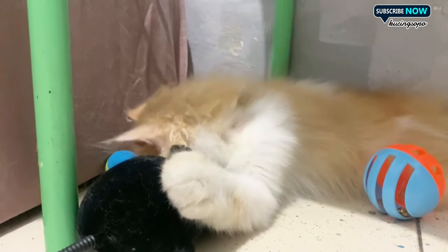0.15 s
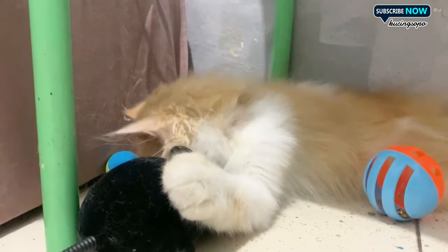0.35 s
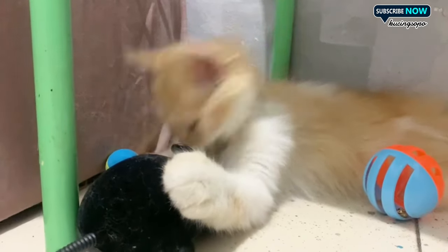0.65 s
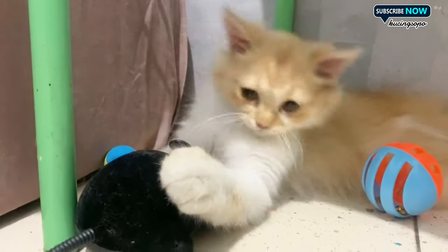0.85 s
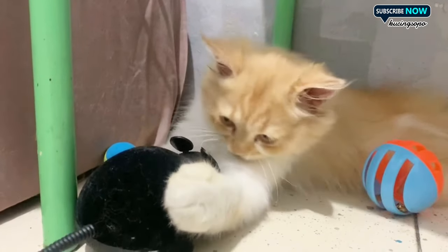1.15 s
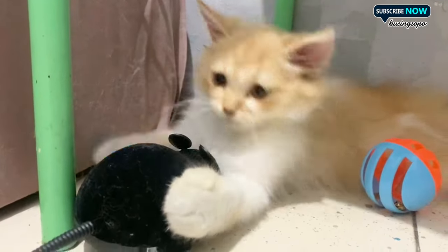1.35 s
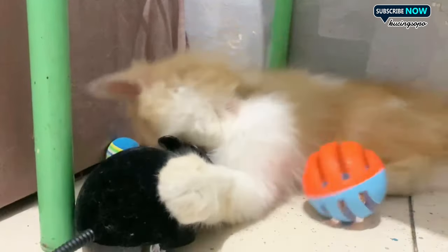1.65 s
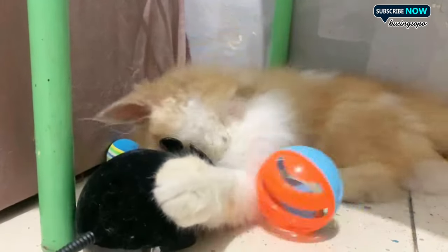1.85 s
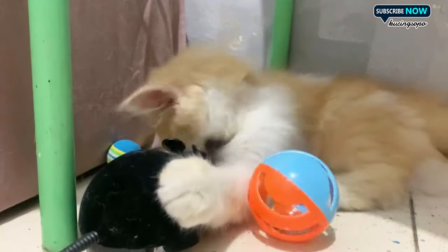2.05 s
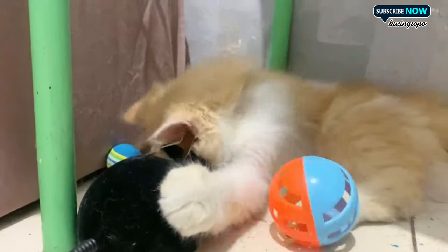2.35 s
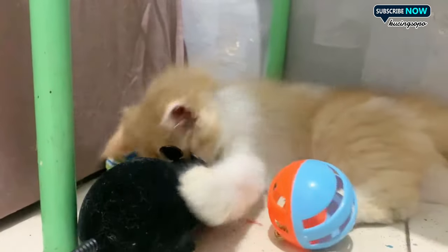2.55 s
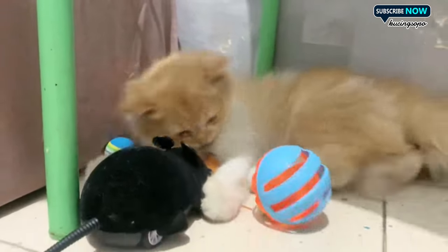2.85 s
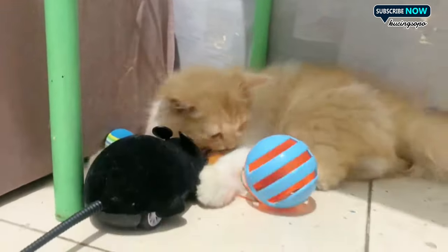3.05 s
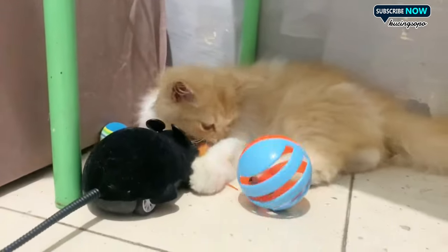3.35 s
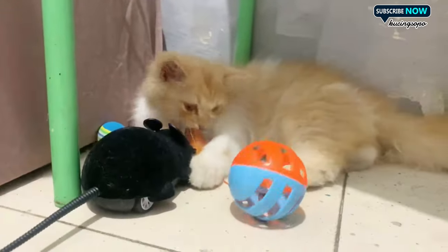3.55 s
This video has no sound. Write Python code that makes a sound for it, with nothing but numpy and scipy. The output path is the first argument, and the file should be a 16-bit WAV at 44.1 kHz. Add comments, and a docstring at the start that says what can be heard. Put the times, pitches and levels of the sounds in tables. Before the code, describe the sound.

A belled plastic ball jingles and rattles on tile in a quick burst over low hum.

```python
"""Belled ball on a tile floor

A kitten bats a slotted plastic ball, close to the microphone, in a small hard room. The bell inside knocks
and chatters on the shell: struck modes plus decaying noise. One drop thumps hollow; a paw taps a toy (noise).
Hits get a diffuse tail. Behind: a motor's hum (wavering sine lines) and coloured room noise."""
import sys
import numpy as np
from scipy import signal
from scipy.fft import rfft, irfft
from scipy.io import wavfile
from scipy.ndimage import uniform_filter1d

SR = 44100
rng = np.random.default_rng(int(sys.argv[2]) if len(sys.argv) > 2 else 0)


def waveform_to_disk(signal):
    """Save audio, clipped to [-1, 1], as 16-bit WAV at the path in sys.argv[1]."""
    frames = np.transpose(np.atleast_2d(signal))
    scaled = np.clip(frames, -1, 1) * 32767
    samples = np.round(scaled).astype(np.int16)
    wavfile.write(sys.argv[1], SR, samples)


N = 163170  # samples
SIDES = np.array([[1], [-1]])  # left, right; every *_LEFT_DB is left over right


def amp(db):
    """Decibels to gain."""
    return 10 ** (np.asarray(db) / 20)


def unit(x):
    """Scale to rms 1."""
    return x / np.sqrt(np.mean(x ** 2) + 1e-30)


def strike(x):
    """Scale a two-sided sound to mean energy 1 per side."""
    return x / np.sqrt(np.sum(x ** 2) / 2)


def along(points, hz):
    """Read (f/Hz, value) points on a log-frequency axis."""
    f, v = np.array(points, float).T
    return np.interp(np.log(hz + 1), np.log(f), v)


def noise(points, size):
    """Two unrelated noises of one colour, rms 1."""
    hz = np.fft.rfftfreq(size, 1 / SR)
    spectrum = rfft(rng.standard_normal((2, size)))
    return unit(irfft(spectrum * amp(along(points, hz)), size))


def walk(steps_per_s):
    """Smoothed random steps with a spread near 1."""
    k = int(SR / steps_per_s)
    steps = np.repeat(rng.standard_normal(200), k)[:N + 2 * k]
    smooth = uniform_filter1d(uniform_filter1d(steps, k), k)
    return 1.266 * smooth[k:k + N]


def fade(t60_s, size):
    """Exponential decay, -60 dB at t60_s."""
    return np.exp(-np.log(1000) * np.arange(size) / SR / t60_s)


def add(out, start_s, sound):
    """Mix a sound in at a time."""
    i = max(int(start_s * SR), 0)
    out[:, i:i + sound.shape[1]] += sound[:, :max(N - i, 0)]


MODE_SCATTER_DB, MODE_DETUNE_RATIO = 4, 0.005  # standard deviations per blow
MODE_PHASE_SPREAD_RAD = 0.057  # standard deviation, opposite on the two sides
NOTE_WIDTH_OCTAVES = 0.054


def ring(modes, size, note_hz=1000, note_db=0):
    """Struck modes as decaying sines, lifted around one note; each blow redraws strength, tuning and phase."""
    t, out = np.arange(size) / SR, 0
    for hz, db, t60_s in modes:
        strength, detune, phase, apart = rng.standard_normal(4)
        note = note_db * np.exp(-(np.log2(hz / note_hz) / NOTE_WIDTH_OCTAVES) ** 2)
        angle = 2 * np.pi * (hz * (1 + MODE_DETUNE_RATIO * detune) * t + phase)
        angle = angle + MODE_PHASE_SPREAD_RAD * apart * SIDES
        gain = amp(db + note + MODE_SCATTER_DB * strength)
        out = out + gain * fade(t60_s, size) * np.sin(angle)
    return out / 2


# bell modes: f/Hz, relative level/dB, t60/s
BELL_MODES = [(6580,-8,0.095), (6910,0.5,0.087), (6930,-10,.06), (7420,3,0.052), (7670,2,.06),
              (9150,10,.055), (9500,1.5,.06), (9760,0,.08), (10320,-3,0.09), (10650,4,0.039),
              (11170,7.5,0.027), (11500,-1.5,.06)]
# shell modes: f/Hz, relative level/dB, t60/s
SHELL_MODES = [(543,-6.5,0.082), (673,-7.5,.07), (840,2.5,0.037), (1406,-2.5,.05), (1660,4,0.024),
               (1988,-3,0.12), (2670,-1,.06)]
# longer modes of the ball and its air: f/Hz, relative level/dB, t60/s
CAVITY_MODES = [(2264,1.5,.2), (3040,0,0.1), (3450,-2.5,0.17), (4160,-5.5,0.15), (4460,2,.05),
                (4595,-4.5,0.26), (4740,-4.5,.07), (5050,-4.5,.045), (5420,-5.5,0.087), (5610,-4,.045)]
# metal noise colour: f/Hz, relative density/dB per Hz
CRACK_COLOUR = [(1500,-28.5), (3600,-25), (4600,-4), (5900,-46.5), (6900,8.5), (7550,6.5), (7950,-23),
                (8600,3.5), (10400,8), (11400,-9), (12500,-16)]
# plastic noise colour: f/Hz, relative density/dB per Hz
CLACK_COLOUR = [(250,-5.5), (550,5), (1200,-3), (2400,1.5), (3600,-4.5), (6000,-25)]
BELL_RING_DB, CRACK_DB, SHELL_RING_DB, CLACK_DB = -7.5, -6, -3, -4  # mix inside one contact
CRACK_T60_S, CLACK_T60_S = .027, 0.059
TICK_DB, TICK_T60_S = 2.5, 0.0068  # first instant, over the crack
CRACK_APART_RATIO = 0.33  # share that differs between sides
BELL_NOTE_DB, CAVITY_NOTE_DB = 10.5, 9
SHELL_LEFT_DB = 3


def contact(bell_hz, ball_hz, size=8000):
    """One touch of bell on shell: bright metal, hollow plastic and ringing ball, each scaled to energy 1."""
    common, apart = noise(CRACK_COLOUR, size)
    decay = fade(CRACK_T60_S, size) + amp(TICK_DB) * fade(TICK_T60_S, size)
    crack = (common + CRACK_APART_RATIO * apart * SIDES) * decay
    bell = ring(BELL_MODES, size, bell_hz, BELL_NOTE_DB)
    metal = amp(BELL_RING_DB) * bell + amp(CRACK_DB) * crack

    shell = ring(SHELL_MODES, size)
    clack = noise(CLACK_COLOUR, size) * fade(CLACK_T60_S, size)
    plastic = amp(SHELL_RING_DB) * shell + amp(CLACK_DB) * clack
    plastic = plastic * amp(SIDES * SHELL_LEFT_DB / 2)

    cavity = ring(CAVITY_MODES, size, ball_hz, CAVITY_NOTE_DB)
    return strike(metal), strike(plastic), strike(cavity)


# bell knocks; the spot hit favours one bell note and one ball note:
# t/s, level/dB before KNOCK_GAIN_DB, bell f/Hz, shell/dB re level before KNOCK_SHELL_GAIN_DB,
# ball f/Hz, cavity ring/dB re level
KNOCK_EVENTS = [(1.6605,-17.5,7200,-15,4760,-13.5), (1.6736,-30,9760,-10,4760,-14),
                (1.738,-32.5,7040,-9,4760,-9), (1.7869,-11,7360,-18,4110,-21),
                (1.8094,-27,9000,-10,4620,-11), (1.8528,-23.5,6700,-16.5,4760,-8),
                (1.8584,-15.5,10370,-15.5,4620,-10.5), (1.9693,-37,6940,-7,4470,-4),
                (1.9961,-22,6940,-18,4470,-17), (2.0138,-17.5,8860,-13,3440,-13),
                (2.0326,-22,6940,-7.5,3440,-8.5), (2.0549,-29.5,9000,-5,4470,-8),
                (2.1358,-23,7500,-17.5,3440,-19.5), (2.148,-29,6800,-10,3440,-7.5),
                (2.1615,-25.5,11060,-19,3440,-17), (2.2033,-28.5,11060,-7,3440,-6),
                (2.277,-33.5,10740,-4.5,3440,-7), (2.3649,-38.5,7400,-2,2277,6.5),
                (2.3768,-38.5,10700,-6,4620,-13), (2.429,-26.5,11000,-24,2277,-1.5),
                (3.4358,-37,10800,0,2277,2), (3.56,-42,10230,1,2277,2)]
KNOCK_GAIN_DB, KNOCK_SHELL_GAIN_DB = 13, -1.5
REBOUND_S, REBOUND_DB = .0016, 0


def knocks():
    """Single hard knocks of bell on shell, each with a quick rebound as a second contact."""
    out = np.zeros((2, N))
    for start_s, db, bell_hz, shell_db, ball_hz, cavity_db in KNOCK_EVENTS:
        for delay_s, touch_db in ((0, 0), (REBOUND_S, REBOUND_DB)):
            metal, plastic, cavity = contact(bell_hz, ball_hz)
            knock = metal + amp(shell_db + KNOCK_SHELL_GAIN_DB) * plastic + amp(cavity_db) * cavity
            add(out, start_s + delay_s, amp(db + touch_db + KNOCK_GAIN_DB) * knock)
    return out


# bell skittering round the shell: peak t/s, rise/s, fall/s (to 1/e), level/dB before TUMBLE_GAIN_DB,
# body/dB re level (shell; cavity is TUMBLE_CAVITY_DB below it)
TUMBLE_EVENTS = [(1.535,.01,0.0061,-51.5,-12), (1.625,0.049,.07,-51,-3.5), (1.672,.0069,0.0048,-45.5,-6),
                 (1.75,0.059,0.024,-49.5,-2), (1.83,0.039,0.026,-44.5,-2.5), (1.861,0.0018,0.001,-27,-6),
                 (1.87,0.0085,0.033,-50.5,2.5), (1.95,.034,.039,-55.5,-0.5), (2.015,0.039,0.041,-45.5,-1.5),
                 (2.07,0.0095,0.0065,-45.5,-3), (2.17,0.039,0.063,-54.5,-2), (2.375,0.011,0.032,-49,-3.5),
                 (2.434,0.01,0.0043,-38.5,-6.5), (2.451,0.0059,0.02,-52,0.5), (2.599,.016,.011,-63,0.5),
                 (2.801,0.017,0.01,-51.5,-1), (2.937,0.014,.02,-52.5,3), (3.128,0.018,.02,-56.5,5.5),
                 (3.29,.04,0.068,-67,6), (3.43,0.026,0.065,-59.5,6.5), (3.575,0.012,0.052,-65,8)]
TUMBLE_GAIN_DB, TUMBLE_CAVITY_DB = 2, -12
CHATTER_PER_S, CHATTER_SCATTER_DB = 420, 4.5  # mean rate over all spots, standard deviation


def tumbles(size=22050, count=3):
    """Dense random contacts on a few spots of the shell, swelling and dying away as the ball turns."""
    out, t = np.zeros((2, N)), (np.arange(size) - size // 2) / SR
    for peak_s, rise_s, fall_s, db, body_db in TUMBLE_EVENTS:
        swell = np.exp(np.minimum(t / rise_s, -t / fall_s))
        hits = rng.random((count, size)) < CHATTER_PER_S / count / SR
        touches = hits * amp(CHATTER_SCATTER_DB * rng.standard_normal((count, size)))
        pushes = unit(touches * swell) * np.sqrt(np.mean(swell ** 2) / count)
        for push in pushes:
            metal, plastic, cavity = contact(rng.choice(BELL_MODES)[0], rng.choice(CAVITY_MODES)[0])
            spot = metal + amp(body_db) * (plastic + amp(TUMBLE_CAVITY_DB) * cavity)
            chatter = signal.fftconvolve(push[None], spot, axes=1)
            add(out, peak_s + t[0], amp(db + TUMBLE_GAIN_DB) * chatter)
    return out


# hollow thump modes: f/Hz, relative level/dB, t60/s
THUMP_MODES = [(555,-1,0.054), (690,0,.06), (848,-5.5,0.044)]
DROP_S, DROP_DB = 1.866, -30.5


def drop(size=8000):
    """The ball lands on the tile once: a few low modes ring as a hollow thump."""
    out = np.zeros((2, N))
    add(out, DROP_S, amp(DROP_DB) * ring(THUMP_MODES, size))
    return out


# phase lead of the left side: f/Hz, phase/rad
PORT_PHASE_LEAD = [(300,0), (700,.7), (1300,0), (2100,-2.0), (3300,-2.4), (4600,-.9), (6000,.2),
                   (7240,-1.1), (8100,-2.9), (9130,-3.5), (10400,-5.6), (11000,-6.3), (12000,-7.6)]


def ports(x):
    """The near ball reaches the two microphone ports in different phase, split evenly between sides."""
    phase = along(PORT_PHASE_LEAD, np.fft.rfftfreq(N, 1 / SR))
    return irfft(rfft(x) * np.exp(1j * phase * SIDES / 2), N)


# paw taps on plastic: t/s, level/dB
TAP_EVENTS = [(2.748,-33.5), (2.762,-34.5), (2.922,-45)]
# tap noise colour: f/Hz, relative density/dB per Hz
TAP_COLOUR = [(200,-14), (500,2), (1000,3), (1600,-5.5), (3000,-9), (5000,-10), (8000,-19.5), (10500,-12.5),
              (12500,-34)]
TAP_RISE_S, TAP_T60_S, TAP_LEFT_DB = 0.0009, 0.04, 3.5


def taps(size=6000):
    """Short dull taps of a soft paw: coloured noise with a soft onset, a little to the left."""
    out = np.zeros((2, N))
    onset = 1 - np.exp(-np.arange(size) / SR / TAP_RISE_S)
    shape = onset * fade(TAP_T60_S, size)
    for start_s, db in TAP_EVENTS:
        add(out, start_s, amp(db) * noise(TAP_COLOUR, size) * shape)
    return out * amp(SIDES * TAP_LEFT_DB / 2)


ROOM_T60_S, ROOM_DB, ROOM_GAP_S = 0.27, -28.5, 0.011


def room(x, size=22050):
    """Adds a short diffuse tail from tiles and walls: convolution with decaying noise after a gap."""
    after_gap = np.arange(size) / SR > ROOM_GAP_S
    tail = strike(rng.standard_normal((2, size)) * fade(ROOM_T60_S, size) * after_gap)
    return x + amp(ROOM_DB) * signal.fftconvolve(x, tail, axes=1)[:, :N]


# motor fundamental's slow swell: t/s, level/dB
MOTOR_SWELL = [(0.0,-42.5), (0.51,-37), (1.23,-42), (2.19,-36.5), (2.26,-41), (2.75,-36.5), (2.91,-41.5),
               (3.21,-37.5), (3.7,-40)]
# upper motor lines: nominal f/Hz, level/dB, unsteadiness/ratio
HUM_LINES = [(160.4,-53.5,1.2), (200.9,-53,1.33), (271.8,-54.5,1.2), (372,-64.5,3), (410.7,-61.5,4.4),
             (668.3,-65.5,2)]
MOTOR_NOMINAL_HZ, MOTOR_UNSTEADY_RATIO = 54.53, 0.047
MOTOR_LAG_S, MOTOR_LEFT_DB = .00028, 0.7  # the left hears the fundamental late
WAVER_STEPS_PER_S, DRIFT_STEPS_PER_S, DRIFT_RATIO = 14, 3, 0.00809


def hum():
    """A motor: a deep swelling fundamental under weaker lines; pitch drifts together, each line wavers alone."""
    turns = np.cumsum(1 + DRIFT_RATIO * walk(DRIFT_STEPS_PER_S)) / SR
    swell_db = np.interp(np.arange(N) / SR, *np.array(MOTOR_SWELL).T)
    lag_s = np.array([[MOTOR_LAG_S], [0]])
    fundamental = (MOTOR_NOMINAL_HZ, swell_db, MOTOR_UNSTEADY_RATIO, lag_s)
    upper = [(*line, 0) for line in HUM_LINES]
    out = 0
    for hz, db, unsteady, late_s in [fundamental, *upper]:
        waver = 1 + unsteady * (walk(WAVER_STEPS_PER_S) + 1j * walk(WAVER_STEPS_PER_S))
        line = np.real(waver * np.exp(2j * np.pi * hz * (turns - late_s)))
        out = out + amp(db) * unit(line)
    return out * amp(SIDES * MOTOR_LEFT_DB / 2)


# room noise colour: f/Hz, relative density/dB per Hz
AIR_COLOUR = [(20,-20.5), (40,-5.5), (60,-1), (80,0), (125,-1.5), (185,-4.5), (240,-7), (400,-10),
              (500,-17.5), (680,-18), (1100,-21), (1700,-23), (2700,-27), (3400,-34.5), (4600,-36),
              (7000,-41.5), (8300,-79), (10000,-49.5), (11600,-50), (12200,-73.5)]
# likeness of the two sides: f/Hz, correlation/ratio (clipped below 1)
AIR_LIKENESS = [(100,0.76), (270,1), (580,0.04), (1250,0.12), (2500,-0.01), (8000,0)]
# left over right: f/Hz, level/dB
AIR_LEAN = [(100,1), (200,.5), (350,2.3), (630,5.1), (1150,5.7), (2070,1.4), (3700,.5)]
AIR_DB = -45


def air():
    """Steady coloured room noise from mid and side parts: bass alike on both sides, the middle leaning left."""
    hz = np.fft.rfftfreq(N, 1 / SR)
    mid, side = rfft(noise(AIR_COLOUR, N))
    alike = np.clip(along(AIR_LIKENESS, hz), -.9, .995)
    both = mid + SIDES * side * np.sqrt((1 - alike) / (1 + alike))
    both = both * amp(SIDES * along(AIR_LEAN, hz) / 2)
    return amp(AIR_DB) * unit(irfft(both, N))


def scene():
    """Ball and paw in the room, over motor hum and room noise."""
    ball = ports(knocks() + tumbles() + drop())
    return room(ball + taps()) + hum() + air()


TOP_HZ = 12300


def record(dry):
    """The recorder cuts the top: a steep elliptic low-pass."""
    lowpass = signal.ellip(8, .2, 70, TOP_HZ, fs=SR, output="sos")  # order, ripple/dB, stopband/dB
    return signal.sosfilt(lowpass, dry)


dry = scene()
out = record(dry)
waveform_to_disk(out)
```